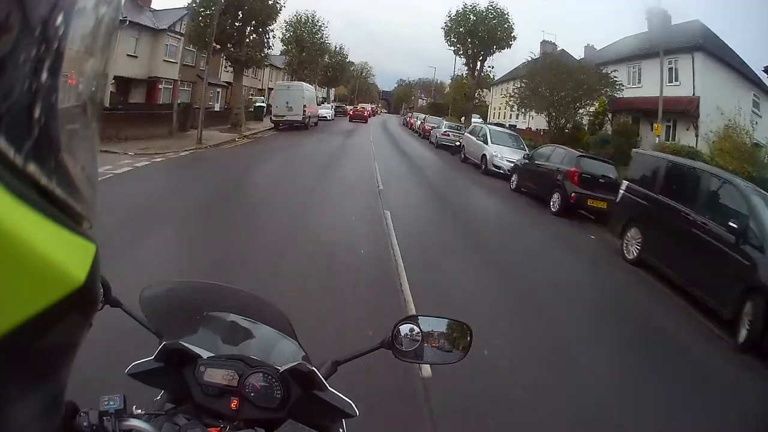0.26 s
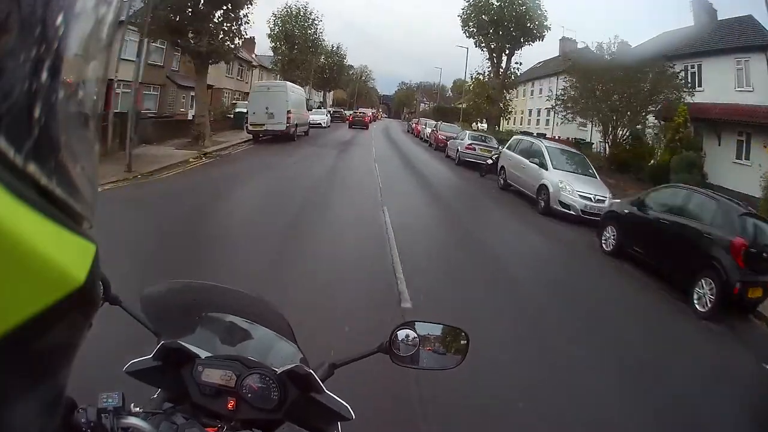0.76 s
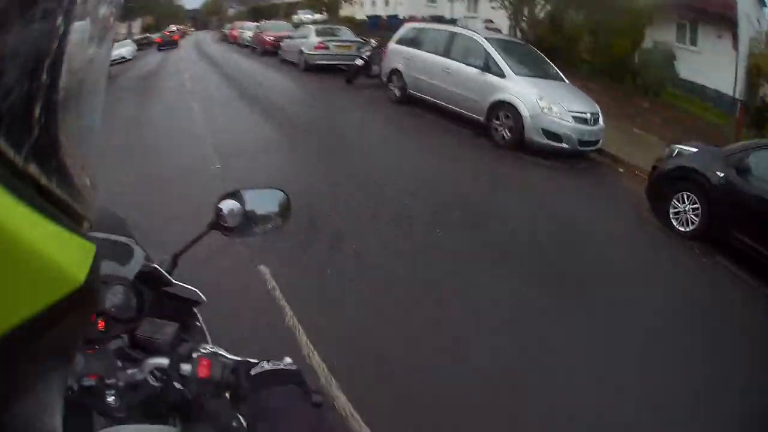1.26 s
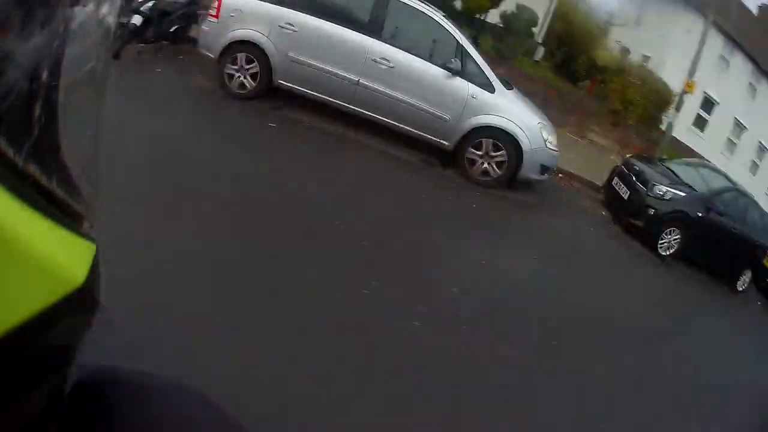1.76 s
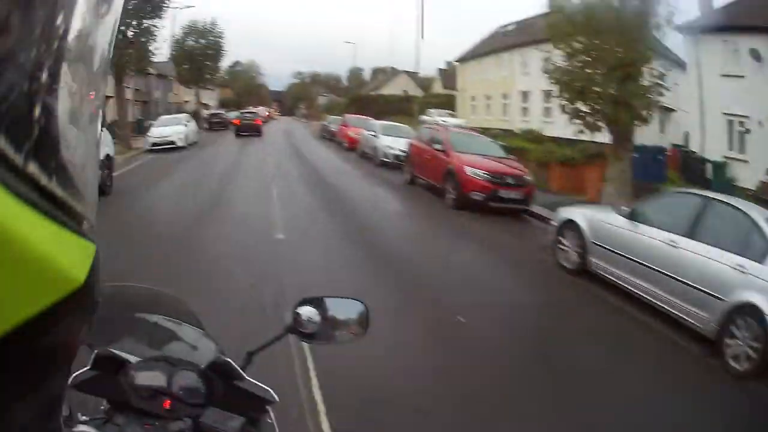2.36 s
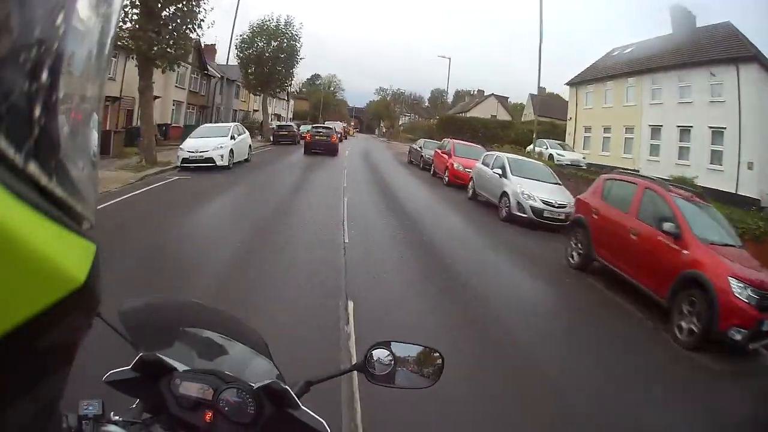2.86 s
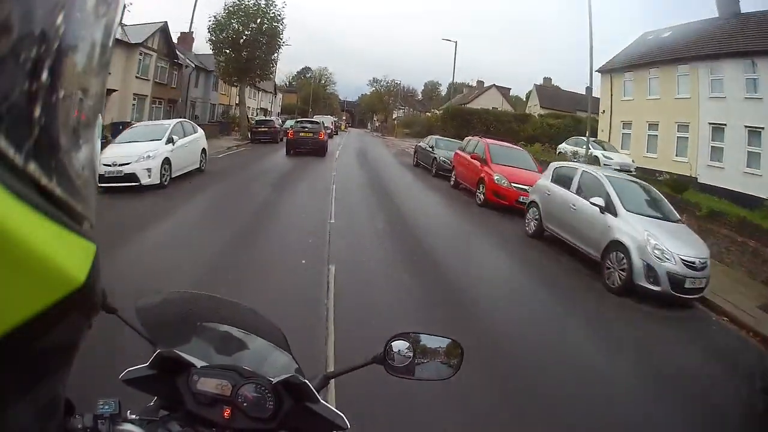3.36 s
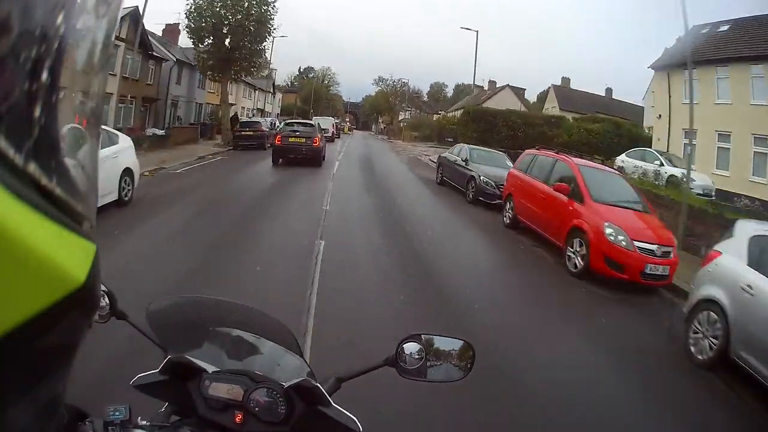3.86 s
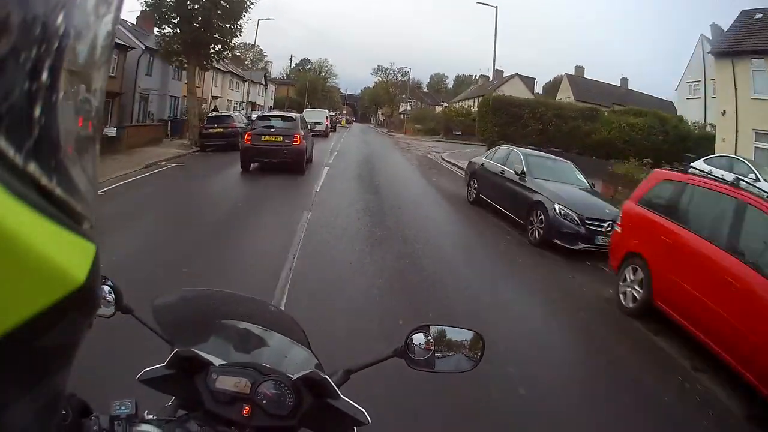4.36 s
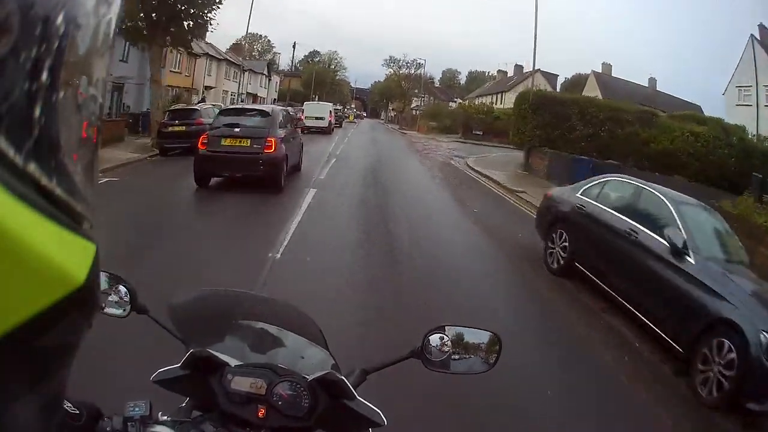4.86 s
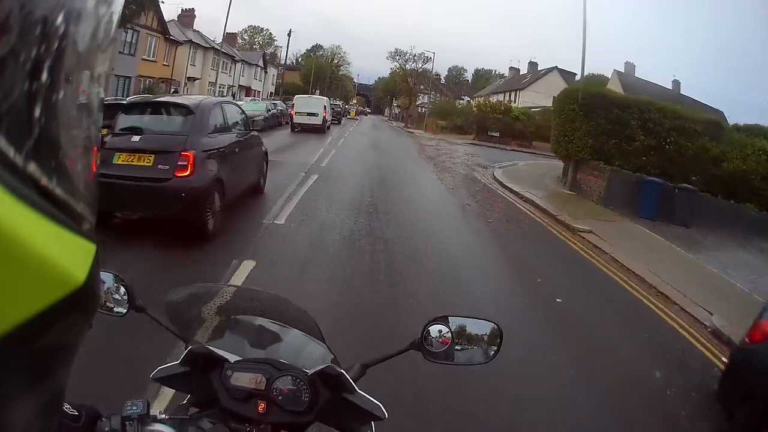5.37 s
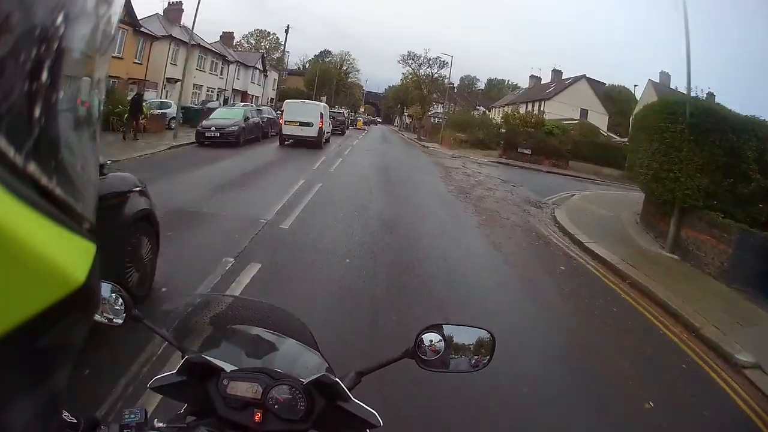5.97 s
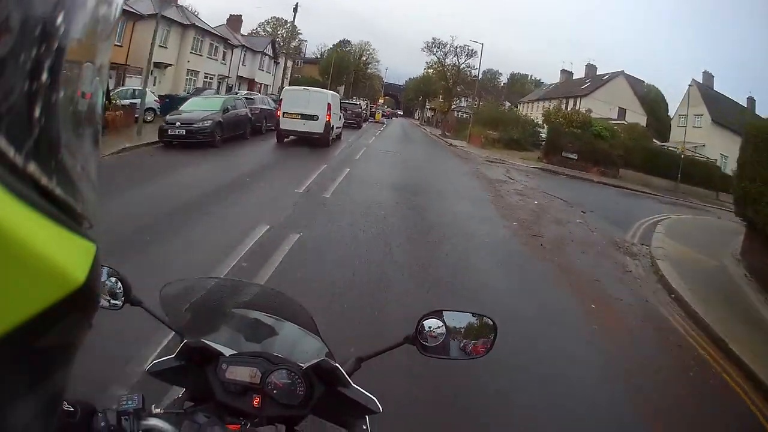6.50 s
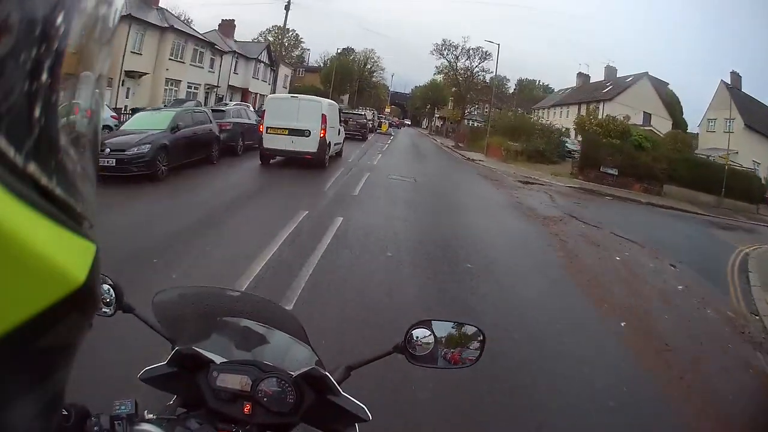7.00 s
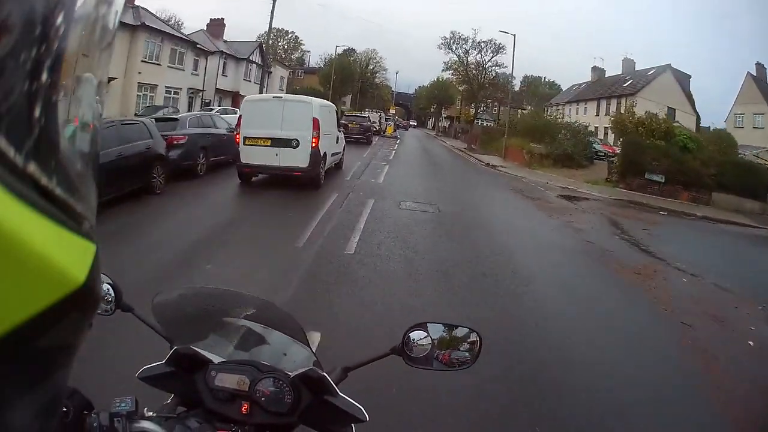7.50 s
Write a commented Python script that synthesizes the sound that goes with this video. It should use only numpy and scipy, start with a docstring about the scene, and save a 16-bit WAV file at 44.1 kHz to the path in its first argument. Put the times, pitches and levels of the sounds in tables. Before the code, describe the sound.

A motorcycle rolls along a wet suburban street, heard from a microphone on the rider's helmet. A steady low engine hum sits under dull fluttering wind and wet tyre roar. Early on the head turns and wind scrapes and snaps sharply, then drops into a lull and gusts back. The engine note eases down; near the end the throttle shuts, leaving a softer burble, faint gear whine and weakening wind.

```python
"""A motorcycle rolls down a wet street and slows, heard from the rider's helmet until past the throttle's shutting.
The engine is a stack of sines on the firing rate, with a gear whine and a burble on the closed throttle.
Wind at the microphone is four bands of fluttering noise with brief dull swells, dropping in the helmet's lee.
Side wind scrapes and snaps in shaped noise while the head turns.
Wet tyres roar as coloured noise that follows the revs; a gliding tone squeaks and a raindrop ticks."""
import sys
import numpy as np
from scipy import signal
from scipy.fft import rfft, irfft
from scipy.io import wavfile
from scipy.ndimage import uniform_filter1d

SR = 44100
rng = np.random.default_rng(int(sys.argv[2]) if len(sys.argv) > 2 else 0)


def dump(signal):
    """Clip the signal to [-1, 1] and save it as 16-bit WAV at the path in sys.argv[1]."""
    limited = np.clip(np.atleast_2d(signal).T, -1, 1)
    pcm = np.round(limited * 32767).astype(np.int16)
    wavfile.write(sys.argv[1], SR, pcm)


N = 341328
T = np.arange(N) / SR

# Firing rate of the slowing engine; the tyres follow it too: t/s, firings per second/Hz
FIRING_RATE = [(0, 106.1), (.6, 105.7), (1.5, 104.4), (2.5, 103.2), (3.0, 101.9), (3.6, 98.8), (4.4, 92.2),
               (4.76, 95), (4.9, 90.8), (5.4, 90.8), (5.85, 90), (6.0, 86.5), (6.25, 85), (6.33, 83.2),
               (6.8, 77.9), (7.0, 75.9), (7.1, 74), (7.5, 70.2), (7.74, 68.2)]
# Brief dull swells in the wind's flutter, each after a short dip: t/s, strength/dB
FLUTTER_SWELLS = [(0.048, -40), (0.236, -57), (0.275, -35), (0.451, -43), (0.667, -42), (0.929, -44),
                  (1.433, -32.5), (1.717, -40), (1.836, -48), (2.603, -46), (2.762, -49), (3.101, -45),
                  (3.301, -45), (4.046, -42), (4.174, -48), (4.327, -41), (4.727, -59), (5.082, -42),
                  (5.289, -38), (5.309, -39), (5.868, -40), (6.018, -51), (6.394, -42.5), (6.699, -45),
                  (6.948, -43.5)]
# Colour of side wind at the port, for scrape and snaps: f/Hz, relative level per Hz/dB
PORT_COLOUR = [(470, -11.5), (800, -2.5), (1470, -6), (1830, -8), (2200, -11), (4230, -16.5), (4590, -19),
               (8830, -21.5), (12500, -45), (16200, -78), (22000, -120)]


def gain_of(db):
    """Decibels to an amplitude factor."""
    return 10 ** (np.asarray(db) / 20)


def evened(x):
    """Scales to rms 1."""
    return x / np.sqrt(np.mean(x ** 2) + 1e-20)


def columns(rows):
    """Each column of a curve table after the time, as one value a sample."""
    times, *rest = np.transpose(rows)
    return [np.interp(T, times, column) for column in rest]


def bump(s, length):
    """Bell of height 1 around a moment, down to 1/e one length away."""
    return np.exp(-((T - s) / length) ** 2)


def drift(slow_hz, fast_hz):
    """Chance wandering of rms 1, slower parts stronger, between two rates."""
    hz = np.fft.rfftfreq(N, 1 / SR)
    shape = hz / (hz + slow_hz) / np.sqrt(hz + slow_hz)
    shape = shape / (1 + (hz / fast_hz) ** 2)
    return evened(irfft(rfft(rng.standard_normal(N)) * shape, N))


def colour_curve(spectrum, hz):
    """Spectrum levels in dB joined by lines over log frequency, -90 dB outside."""
    f, db = np.transpose(spectrum)
    return np.interp(np.log(hz + 1), np.log(f + 1), db, -90, -90)


def noise(spectrum, patchy_db):
    """Coloured noise of rms 1 whose bands swell in patches of some 50 ms by 300 Hz."""
    hz = np.fft.rfftfreq(2048, 1 / SR)
    real, imag, patches = rng.standard_normal((N // 512 + 5, len(hz), 3)).T
    patches = uniform_filter1d(patches, size=14, axis=0)  # over frequency
    patches = evened(uniform_filter1d(patches, size=4, axis=1))  # over time
    level_db = colour_curve(spectrum, hz)[:, None] + patchy_db * patches
    frames = (real + 1j * imag) * gain_of(level_db)
    return evened(signal.istft(frames, nperseg=2048, noverlap=1536)[1][:N])


def port_ring(spectrum):
    """Minimum-phase response with this colour, so the port rings only after the air hits it."""
    cepstrum = irfft(colour_curve(spectrum, np.fft.rfftfreq(N, 1 / SR)), N)
    cepstrum = cepstrum * np.where(np.arange(N) < N // 2, 2, 0)  # fold onto positive times
    cepstrum[0] /= 2
    response = gain_of(rfft(cepstrum))
    return response / np.sqrt(np.mean(abs(response) ** 2))


def bursts(rows, length, spectrum, crack):
    """Short bursts of noise, quick to rise and slower to die, coloured by the port."""
    age = np.arange(2048) / SR / length
    shape = np.sqrt(age) * np.exp(-age)
    puffs = rng.standard_normal((len(rows), len(age))) * shape
    puffs[:, round(length * SR)] += crack  # one-sample click inside the burst
    puffs *= np.linalg.norm(shape) / np.linalg.norm(puffs, axis=1, keepdims=True)
    out = np.zeros(N + len(age))
    for (s, db), puff in zip(rows, puffs):
        start = round(s * SR)
        out[start:start + len(age)] += gain_of(db) * puff
    return irfft(rfft(out[:N]) * port_ring(spectrum), N)


def exhaust(turns):
    """Sines at halves and multiples of the firing rate; load tilts their balance."""
    # Throttle, shutting near 5.9 s: t/s, level/dB, tilt per octave of order/dB
    throttle = [(0, -44, -4), (.6, -46.5, -2.5), (1.8, -46.5, -.8), (2.2, -47, -1), (2.45, -44.5, -4),
                (3.0, -50, 4), (3.6, -47, 0), (4.3, -52, 4.5), (4.6, -49, -0.5), (4.95, -50, 3.5),
                (5.4, -47.5, 4), (5.6, -50, 2.5), (5.88, -49, 4), (5.92, -59, 1), (6.15, -57.5, 1),
                (6.4, -57, 1), (7.0, -57, 1), (7.74, -57, 1)]
    # Exhaust orders: multiple of the firing rate, relative level/dB
    orders = [(.5, -28), (1, 0), (2, -5.5), (2.5, -24), (3, -15), (3.5, -27), (4, -17.5), (4.5, -26),
              (5, -25), (6, -32)]
    level_db, load_db = columns(throttle)
    out = np.zeros(N)
    for multiple, db in orders:
        # uneven combustion shakes the upper orders most
        waver_db = 0.45 * multiple * drift(2, 20)
        order_db = db + load_db * np.log2(multiple) + waver_db
        out += gain_of(order_db) * np.sin(2 * np.pi * (multiple * turns + rng.random()))
    return gain_of(level_db) * out


def overrun_burble(turns):
    """With the throttle shut the pipe burbles on twice the firing rate."""
    # Burble strength: t/s, level/dB
    strength = [(0, -85), (5.9, -90), (6.0, -72), (6.15, -56), (6.35, -57), (6.6, -67), (6.85, -65),
                (7.05, -59.5), (7.3, -63.5), (7.45, -72), (7.74, -59)]
    level_db = columns(strength)[0] + 2.5 * drift(3, 12)
    return gain_of(level_db) * np.cos(2 * np.pi * 2 * turns)


def gear_whine(turns):
    """Meshing gear teeth sing far above the firing rate."""
    # Whine strength, greatest once the throttle is shut: t/s, level/dB
    strength = [(0, -95), (6.18, -95), (6.25, -82), (6.31, -76), (6.38, -88), (6.45, -82), (6.52, -95),
                (6.74, -90), (6.8, -74.5), (6.95, -75), (6.99, -82), (7.025, -75), (7.06, -90), (7.25, -79),
                (7.33, -83), (7.42, -89), (7.52, -79), (7.6, -86), (7.74, -86)]
    teeth = 22  # meshes per firing
    level_db = columns(strength)[0] + 2.0 * drift(6, 30)
    return gain_of(level_db) * np.sin(2 * np.pi * teeth * turns)


def engine():
    """Exhaust, burble and whine locked to one slightly unsteady firing phase."""
    firing_hz = columns(FIRING_RATE)[0] * (1 + 0.0025 * drift(1.35, 18))
    turns = np.cumsum(firing_hz) / SR
    tones = exhaust(turns) + overrun_burble(turns) + gear_whine(turns)
    return np.sqrt(2) * tones  # sine levels are rms


def wind():
    """Shared eddies shake thud, drum, body and hiss, each by its own amount."""
    # Wind fading with speed, rising as the head swings, dropping in the helmet's lee:
    # t/s, buffeting body/dB, hiss over the shell/dB, low thud/dB, drumming in the shell/dB
    strength = [(0, -43.5, -69, -60, -57), (.45, -44.5, -68.5, -49, -50.5), (.65, -47, -68.5, -59, -48.5),
                (1.25, -47.5, -70.5, -59, -54.5), (1.45, -45.5, -72.5, -50, -59),
                (1.62, -43, -80, -46.5, -53), (1.78, -46, -73.5, -50, -47), (1.86, -64, -78, -65, -76),
                (2.2, -60, -76, -64, -75), (2.245, -57, -76.5, -60, -55), (2.275, -51.5, -75, -44, -43),
                (2.31, -42, -80, -47, -43), (2.34, -43, -67, -47, -50), (2.375, -47, -62, -48, -50),
                (2.4, -39.5, -67, -48, -41.5), (2.45, -39, -67.5, -60, -46), (2.49, -44.5, -66.5, -62, -55),
                (2.55, -40, -66, -47, -60), (2.65, -43, -67.5, -52.5, -50), (3.0, -48, -70, -53, -53.5),
                (3.45, -46, -69, -52, -52), (4.06, -49.5, -70.5, -60, -58), (4.12, -46, -69, -51, -49),
                (4.18, -47.5, -70.5, -59, -55), (4.5, -52, -72, -63, -54.5), (5.28, -52, -71.5, -59, -55.5),
                (5.6, -54.5, -72.5, -62, -56.5), (5.95, -54, -73.5, -57, -56),
                (6.25, -54.5, -73.5, -61, -55), (6.33, -50.5, -75, -64, -58), (6.42, -51, -75, -62, -53),
                (6.7, -58, -75, -59, -56.5), (7.0, -54.5, -77, -60, -57), (7.15, -57.5, -77.5, -65, -56),
                (7.4, -59, -78.5, -63, -57), (7.6, -54.5, -80, -63, -59.5), (7.74, -58, -80, -65, -59)]
    # Colours of the four layers: f/Hz, relative level per Hz/dB
    thud_colour = [(8, -45), (15, -17.5), (43, -6.5), (75, -4.5), (110, -8), (200, -31.5)]
    drum_colour = [(60, -35.5), (100, -1.5), (145, 0), (200, -9), (300, -30)]
    body_colour = [(100, -17), (170, -3.5), (194, -1), (334, -4.5), (381, -6), (566, -9.5), (1070, -23),
                   (1740, -33), (2450, -45), (3500, -47.5), (4000, -48.5), (5200, -47.5), (8800, -120)]
    hiss_colour = [(880, -28), (1500, -24), (1710, -2), (2460, -6.5), (3360, -8.5), (3900, -9), (4350, -6),
                   (4650, -11), (4950, -13.5), (5400, -6.5), (5750, -12), (6500, -10.5), (7300, -13),
                   (8400, -10), (9100, -12.5), (9700, -18.5), (12500, -34), (16200, -65), (22000, -120)]

    body_db, hiss_db, thud_db, drum_db = columns(strength)
    eddies = 2 * np.tanh(drift(2.7, 78) / 2)  # eddies have a largest size
    # the body dips briefly just before each dull swell
    depth_db, dip_s = -6, 0.008
    dip_db = depth_db * sum(bump(s - dip_s, dip_s) for s, _ in FLUTTER_SWELLS)

    thud_db = thud_db + 2 * drift(0.99, 6.1) + 0.23 * eddies
    drum_db = drum_db + drift(1.4, 5.2) + 0.32 * eddies
    body_db = body_db + 0.6 * drift(1.9, 25) + 1.3 * drift(25, 150) + 1.2 * eddies + dip_db
    hiss_db = hiss_db + 1.2 * drift(26, 400) + 0.53 * eddies

    thud = gain_of(thud_db) * noise(thud_colour, patchy_db=0.1)
    drum = gain_of(drum_db) * noise(drum_colour, patchy_db=2.0)
    body = gain_of(body_db) * noise(body_colour, patchy_db=0.9)
    hiss = gain_of(hiss_db) * noise(hiss_colour, patchy_db=1.0)
    return thud + drum + body + hiss


def flutter_swells():
    """Brief dull swells in the wind's flutter, as short bursts of low noise."""
    # Colour of a swell: f/Hz, relative level per Hz/dB
    swell_colour = [(100, -37), (250, 3), (500, 1.5), (800, -0.5), (1300, -15.5), (2200, -30), (4000, -52)]
    return bursts(FLUTTER_SWELLS, 0.0045, swell_colour, crack=0)  # time constant in s


def side_wind_scrape():
    """The head swings and side wind scrapes over the port as rough, bright noise."""
    # Head swings: t of peak/s, level/dB, rise/s, fall/s
    head_swings = [(1.36, -69, 0.027, 0.073), (1.52, -61.5, 0.093, 0.059), (1.62, -60.5, 0.057, 0.14),
                   (2.185, -69, 0.0092, 0.021), (2.285, -60.5, .012, 0.036), (2.37, -64, 0.035, 0.033)]
    envelope = sum(gain_of(db) * bump(s, np.where(T < s, rise, fall))
                   for s, db, rise, fall in head_swings)
    roughness = gain_of(4.0 * drift(40, 400))
    return envelope * roughness * noise(PORT_COLOUR, patchy_db=1.5)


def wind_snaps():
    """Wind snaps across the port in very short bright puffs, each with a click."""
    # Snaps while the head is turned: t/s, strength/dB
    snap_hits = [(1.335, -45), (1.3454, -46), (1.3513, -41), (1.4004, -52), (1.427, -43), (1.4464, -44),
                 (1.4547, -38.5), (1.474, -59), (1.4885, -46), (1.4929, -40), (1.498, -48), (1.508, -53),
                 (1.518, -43), (1.523, -44), (1.5296, -43), (1.54, -52), (1.564, -45), (1.5723, -52),
                 (1.58, -44), (1.5944, -45), (1.6043, -41), (1.612, -49), (1.6326, -52), (1.638, -51),
                 (1.646, -52), (1.658, -56), (1.675, -45), (1.698, -51), (1.703, -50), (1.747, -44.5),
                 (2.1695, -46), (2.181, -47.5), (2.188, -55), (2.281, -44), (2.296, -52), (2.3326, -45),
                 (2.351, -39.5), (2.356, -51), (2.363, -46), (2.368, -45), (2.3744, -38.5), (2.388, -42),
                 (2.4, -42.5), (2.4595, -48)]
    return bursts(snap_hits, 0.00098, PORT_COLOUR, crack=4.0)  # time constant in s


def tyres():
    """Roar and spray of the wet road, fading with speed."""
    # Road noise colour: f/Hz, relative level per Hz/dB
    road_colour = [(12, -40), (40, -2.5), (150, -15), (420, -3), (620, -10), (1080, -26), (1300, -17.5),
                   (1900, -22.5), (2600, -38.5), (3500, -46), (6000, -51), (8800, -32.5), (9600, -44),
                   (12500, -52.5)]
    # A car alongside throws the roar back: t/s, extra level/dB, length/s
    car_alongside = (5.2, 1.6, .6)
    # The turned helmet shades the road: t/s, extra level/dB, length/s
    helmet_shade = (1.95, -1.4, 0.15)
    doublings = np.log2(columns(FIRING_RATE)[0] / 100)
    level_db = -59 + 6 * doublings + 0.25 * drift(0.7, 2.7)  # 6 dB per doubling of speed
    for s, extra_db, length in (car_alongside, helmet_shade):
        level_db = level_db + extra_db * bump(s, length)
    return gain_of(level_db) * noise(road_colour, patchy_db=2.0)


def squeak():
    """One brief tone gliding upward."""
    # t of peak/s, peak level/dB, start f/Hz, end f/Hz, length/s
    s, db, from_hz, to_hz, length = (6.045, -67, 1540, 1700, .025)
    hz = np.interp(T, [s - length, s + length], [from_hz, to_hz])
    return gain_of(db) * bump(s, length) * np.sin(2 * np.pi * np.cumsum(hz) / SR)


def raindrop():
    """A raindrop ticks on the shell: a few cycles of high pitch."""
    # t of peak/s, peak level/dB, f/Hz, length/s
    s, db, hz, length = (5.1284, -53, 10800, .00013)
    return gain_of(db) * bump(s, length) * np.sin(2 * np.pi * hz * (T - s))


def scene():
    """All sources at the one microphone."""
    at_port = wind() + flutter_swells() + side_wind_scrape() + wind_snaps()
    return (engine() + at_port + tyres() + squeak() + raindrop())[None]


def record(dry):
    """A 4 ms fade at each end, a steep treble limit, and a faint circuit hiss."""
    fade = np.minimum(np.minimum(T, T[::-1]) / 0.004, 1)
    low_pass = signal.firwin(511, 12700, window=("kaiser", 9), fs=SR)  # cutoff in Hz
    limited = signal.oaconvolve(dry * fade, low_pass[None], "same")
    return limited + gain_of(-103) * rng.standard_normal(dry.shape)


dry = scene()
out = record(dry)
dump(out)
```